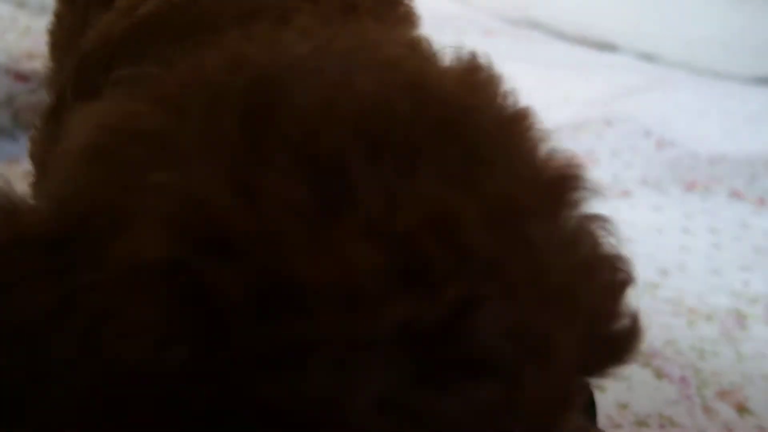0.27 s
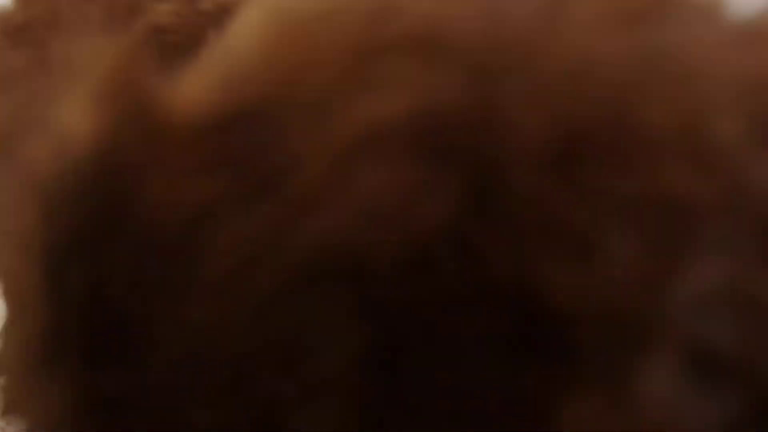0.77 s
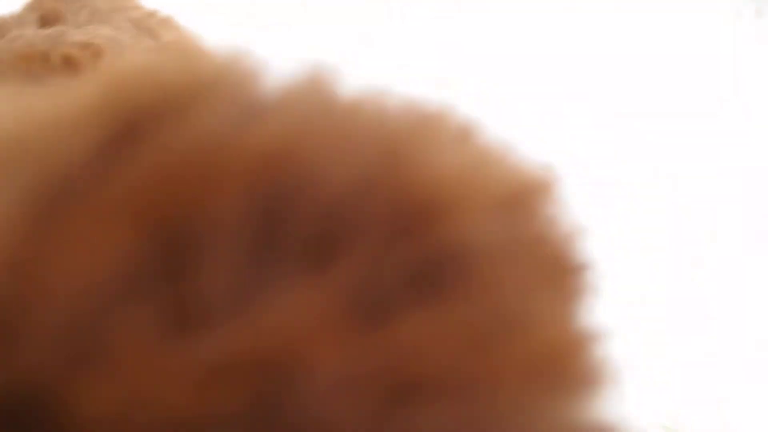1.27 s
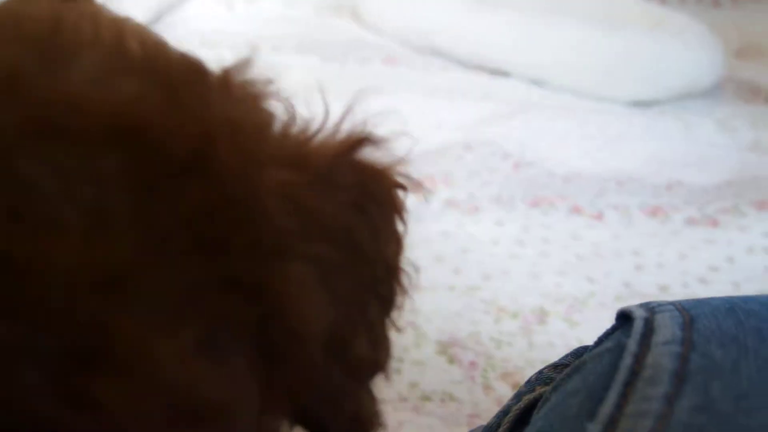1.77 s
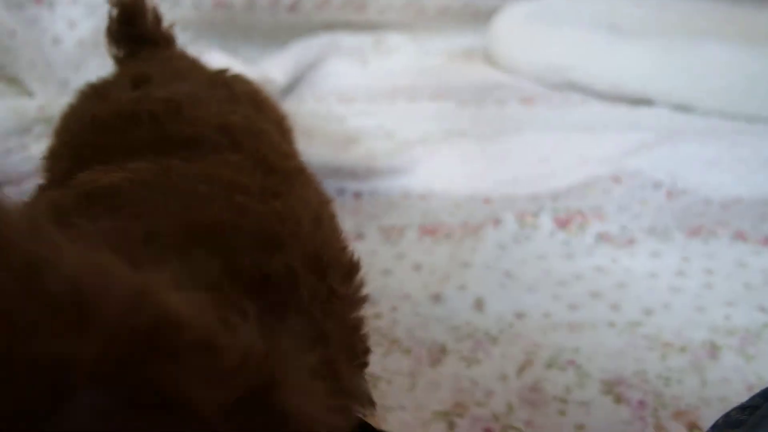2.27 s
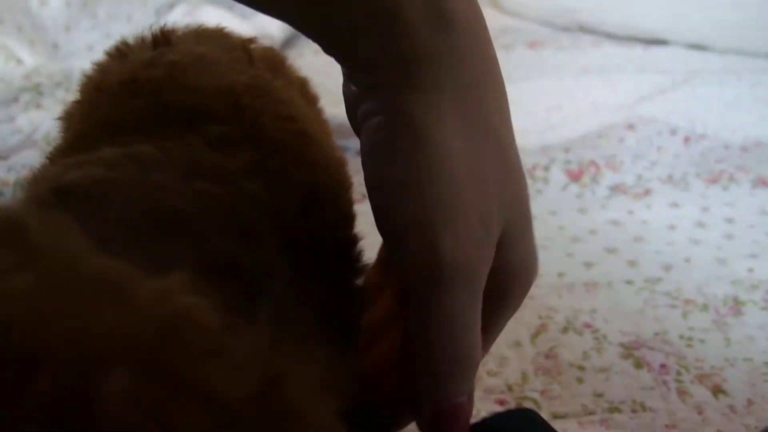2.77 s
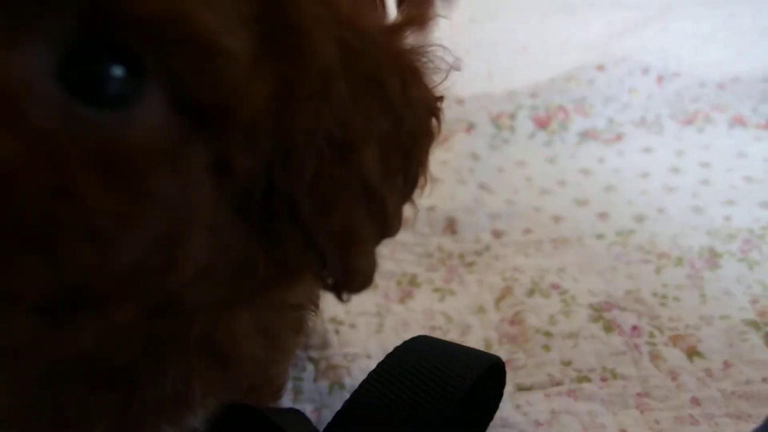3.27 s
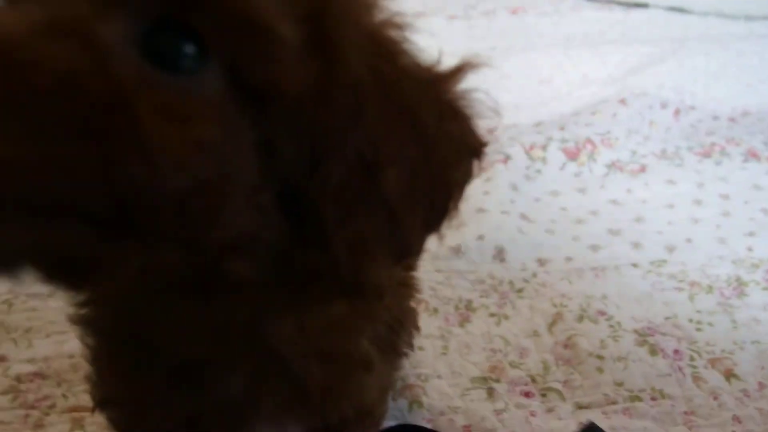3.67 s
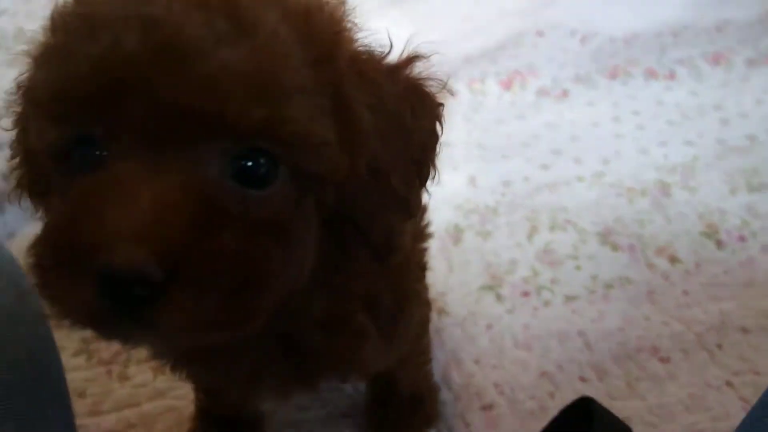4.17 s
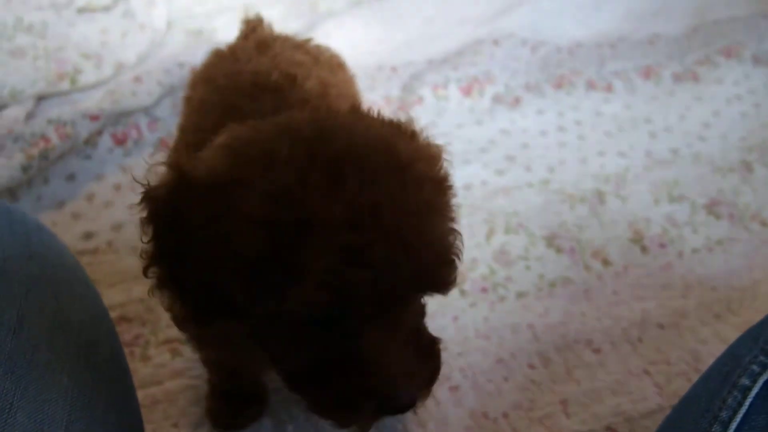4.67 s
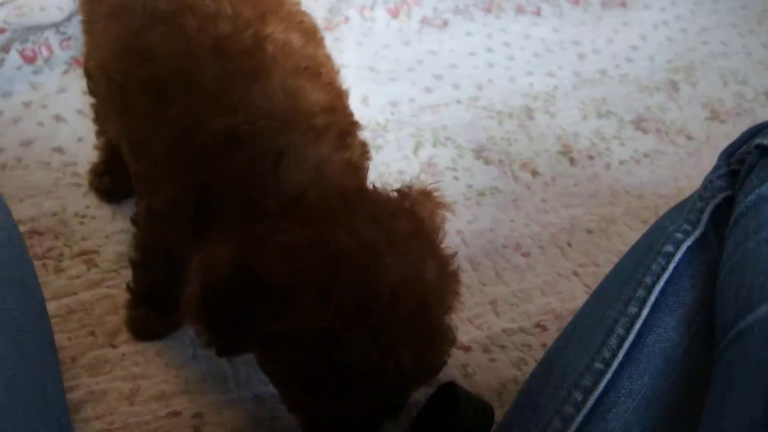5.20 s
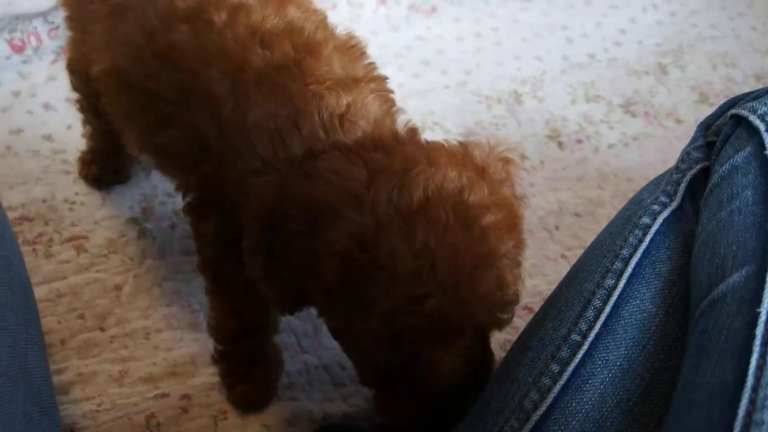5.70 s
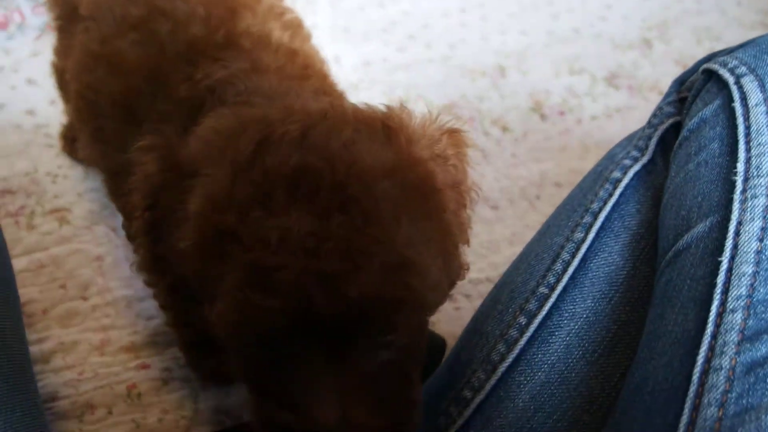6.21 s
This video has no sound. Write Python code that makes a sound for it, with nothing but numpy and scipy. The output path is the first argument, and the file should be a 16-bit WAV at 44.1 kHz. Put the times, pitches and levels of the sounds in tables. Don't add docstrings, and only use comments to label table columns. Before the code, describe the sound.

A quiet indoor room heard through a small hand-held camera: low beating machine hum, muffled rumble, thin hiss, and a faint lens rattle ticking about 15 times a second. Bedding shuffles dully. Light knocks and a soft low thud come around 0.4-0.6 s, then a very hard snap at 1.1 and a lesser one at 1.2, briefly ducking the room. Soft fur and cloth brushing grows from 1.4 to a strong stroke and thump at 1.8, continuing in softer rubs to about 2.9 with heavier mattress movement. It calms until a loud mouth smack at 3.8 and another at 4.0. Strap threads crackle and scrape from 4.05 to 4.5; a full smack lands at 4.8, wet small ones at 4.9. Sharp strap and buckle clicks cluster at 5.0-5.9, hardest near 5.2 and 5.6. Ticking stops at 5.9, a hush, then a bright motor whirr from 6.1 with small knocks to the end.

```python
import sys
import numpy as np
from scipy import signal
from scipy.fft import rfft, irfft, next_fast_len
from scipy.io import wavfile
from scipy.ndimage import uniform_filter1d

SR = 44100
rng = np.random.default_rng(int(sys.argv[2]) if len(sys.argv) > 2 else 0)


def dump(signal):
    limited = np.clip(np.atleast_2d(signal).T, -1, 1)
    pcm = np.round(limited * 32767).astype(np.int16)
    wavfile.write(sys.argv[1], SR, pcm)


def gain_from_decibels(decibels):
    exponent = np.asarray(decibels, float) / 20
    return 10 ** exponent


N = 284423
T_S = np.arange(N) / SR

AIR_DB, MEAN_WEIGHT_DB = -64, -45.5
DRIVE_STOP_S = 5.93
PORT_HZ = 3950


def rms_one(x):
    return x / np.sqrt(np.mean(x ** 2) + 1e-20)


def evened(x, span_s=0.13):
    return x / np.sqrt(uniform_filter1d(np.mean(x ** 2, axis=0), int(span_s * SR)) + 1e-20)


def at_hz(points, hz):
    point_hz, value = np.transpose(points)
    return np.interp(np.log(hz), np.log(point_hz), value)


def drift(rate_hz):
    r = np.exp(-80 * np.pi * rate_hz / SR)
    slow = signal.lfilter([1], [1, -2 * r, r * r], rng.standard_normal(N // 40 + 2002))[2000:]
    return np.interp(np.arange(N) / 40, np.arange(len(slow)), rms_one(slow))


def resonate(x, hz, width_hz):
    r = np.exp(-np.pi * width_hz / SR)
    top = np.array([1, 0, -1]) * (1 - r * r) / 2
    return signal.lfilter(top, [1, -2 * r * np.cos(2 * np.pi * hz / SR), r * r], x)


def resonate_twice(x, hz, width_hz):
    return resonate(resonate(x, hz, width_hz), hz, width_hz)


def band(x, low_hz, high_hz):
    edges_hz = [low_hz, min(high_hz, .45 * SR)]
    return signal.sosfilt(signal.butter(2, edges_hz, "band", fs=SR, output="sos"), x)


def place(x, lean_db, lag=0.):
    n = next_fast_len(x.shape[-1])
    left, right = np.broadcast_to(x, (2, x.shape[-1]))
    if lag:
        delay = np.exp(-2j * np.pi * np.fft.rfftfreq(n) * lag)
        right = irfft(rfft(right, n) * delay, n)[:len(left)]
    return np.array([left * gain_from_decibels(lean_db / 2), right * gain_from_decibels(-lean_db / 2)])


def apart(noise, share):
    return (noise[0] + share * noise[1] * np.array([[1], [-1]])) / np.sqrt(1 + share ** 2)


def coloured(spectrum):
    # f/Hz, likeness/1
    likeness = [(60, 0.99), (150, 0.94), (380, 0.8), (950, 1), (2380, 0.059), (5980, 0.082), (15000, 0.031)]
    # f/Hz, level/dB
    left_lean = [(60, 0.5), (150, 2), (380, 1), (950, -5.5), (2380, -7), (5980, -0.5), (15000, 0.5)]
    n = next_fast_len(N, real=True)
    hz = np.maximum(np.fft.rfftfreq(n, 1 / SR), 1)
    mid, side = rfft(rng.standard_normal((2, N)), n)
    alike = np.clip(at_hz(likeness, hz), -1, 1)
    lean = gain_from_decibels(at_hz(left_lean, hz) / 2)
    pair = np.sqrt(1 + alike) * mid + np.sqrt(1 - alike) * side * [[1], [-1]]
    return rms_one(irfft(pair * gain_from_decibels(at_hz(spectrum, hz)) * [lean, 1 / lean], n)[:, :N])


def gain_control():
    # t/s, depth/dB
    ducks = [(0.0, 2), (1.116, 7.5), (1.21, 3), (1.83, 0.5), (3.817, 5), (3.987, 6.5), (4.766, 0),
             (5.19, 3.5), (5.35, 3.5), (5.64, 3.5), (5.88, 2.5), (6.099, 2.5), (6.3, 1.5)]
    drop_s, recover_db_per_s = 0.018, 14
    depths_db = []
    for s, db in ducks:
        since_s = T_S - s
        depth_db = np.minimum(db * since_s / drop_s, db - recover_db_per_s * since_s)
        depths_db.append(np.clip(depth_db, 0, None))
    return -np.max(depths_db, axis=0)


def shifting_weight():
    # t/s, level/dB
    weight = [(0.0, -49.5), (0.41, -47), (0.57, -47), (0.93, -49), (1.11, -54), (1.33, -53.5), (1.63, -48),
              (1.85, -41.5), (2.86, -42.5), (3.09, -47), (3.57, -49.5), (4.04, -56), (4.44, -50.5),
              (4.63, -51.5), (4.99, -48), (5.19, -53), (6.11, -50), (6.45, -54)]
    s, db = np.transpose(weight)
    return np.interp(T_S, s, db) - MEAN_WEIGHT_DB


def drive_stopped():
    return np.clip((T_S - DRIVE_STOP_S) / 0.15, 0, 1)


def machine_hums(gain_db):
    high_hz, low_hz, in_step_s = 42.06, 36.76, .03
    turn = 2 * np.pi * (T_S - in_step_s)
    port_phase = np.array([[0], [-.32]])
    hum = gain_from_decibels(-37.5 - 30 * drive_stopped()) * np.cos(high_hz * turn + port_phase)
    hum = hum + gain_from_decibels(-44.5) * np.cos(low_hz * turn + port_phase)
    return place(np.sqrt(2) * hum * gain_from_decibels(gain_db + 0.62 * drift(5.9)), -0.43)


def rumble(gain_db, weight_db):
    # f/Hz, density/dB per Hz
    rumble_spectrum = [(11, -44.5), (18, 2.5), (38, -14.5), (60, -4), (105, -3), (158, -0.5), (236, -19.5),
                       (325, -20.5), (429, -31.5), (500, -27.5), (650, -26), (1100, -120)]
    # f/Hz, width/Hz, level/dB
    drone_modes = [(73.4, 7.5, -4), (99.5, 19, -4.5), (165.2, 3.6, -7), (208, 11.6, -2),
                   (250.1, 8.8, -10.5), (308.6, 9.2, -14.5), (364.7, 7, -18)]
    white = rng.standard_normal(N)
    tones = sum(gain_from_decibels(db) * rms_one(resonate_twice(white, hz, w * 1.4)) for hz, w, db in drone_modes)
    low = coloured(rumble_spectrum) + 0.35 * place(tones, 0.87)
    under = evened(band(low, 51.7, 118.4), span_s=0.14) * gain_from_decibels(-36.5 + gain_db + 0.32 * weight_db)
    over_db = 6.5 + MEAN_WEIGHT_DB + weight_db + 1.3 * drift(7.3)
    return under + evened(band(low, 120.0, 530)) * gain_from_decibels(over_db)


def hiss(gain_db):
    # f/Hz, density/dB per Hz
    hiss_spectrum = [(240, -27.5), (400, -8), (432, 0), (918, -3.5), (1070, -40), (1250, -15),
                     (1520, -11.5), (1830, -15), (2610, -15.5), (3840, -11), (5300, -12), (8540, -17.5),
                     (15800, -8.5)]
    whine_hz, top_hz = 15613, 15800
    stop = drive_stopped()
    whine = gain_from_decibels(-2) * np.sin(2 * np.pi * whine_hz * T_S + 1.2 * drift(8) + [[0], [1.2]])
    low_pass = signal.cheby2(10, 40, top_hz + 300, fs=SR, output="sos")
    topped = signal.sosfilt(low_pass, coloured(hiss_spectrum))
    topped = topped - 0.65 * stop * resonate(topped, 12400, 4000)
    return gain_from_decibels(AIR_DB + 0.75 * gain_db) * (gain_from_decibels(8.5 - 5.5 * stop) * topped + whine)


def shuffle(weight_db):
    hush_db, hush_s = -16, 0.16
    level_db = -54 + weight_db + hush_db * drive_stopped() * (T_S < DRIVE_STOP_S + hush_s)
    level_db = level_db + 2.2 * drift(18) + 1.5 * drift(4)
    mid, side = band(rng.standard_normal((2, N)), 397, 1140) * gain_from_decibels(level_db - 2.2 * 0)
    return 3.35 * (place(mid, 1.1) + 0.43 * side * [[1], [-1]])


def lumps(weight_db):
    lumps_per_s, cycles = 90, 5.0
    strength_db = 3.0 * np.minimum(rng.exponential(1, N), 4)
    gives = (rng.random(N) < lumps_per_s / SR) * gain_from_decibels(strength_db) * rng.choice([-1, 1], N)
    dealt = rng.integers(0, 8, N)
    rung = np.zeros(N)
    for k, hz in enumerate(np.geomspace(140, 400, 8)):
        rung += resonate_twice(gives * (dealt == k) + 1e-18, hz, hz / cycles) / hz
    return place(rms_one(rung) * gain_from_decibels(-55 + 1.28 * weight_db), 1.6)


def lens_drive(gain_db):
    # [(f/Hz, level/dB, t60/s, late/s)]
    grips = [
        (0.0, [(730, -8, .04, .008), (1275, 3, .016, 0), (1030, -8, .012, 0), (1900, -3, .04, 0), (3950, -15, .008, .002), (5350, -17, .006, .001)]),
        (1.2, [(740, -6, .035, .009), (1230, 0, .014, 0), (1000, -5, .012, 0), (1900, -4, .04, .001), (4900, -16, .008, .004)]),
        (2.3, [(770, -1, .03, .008), (1270, -1, .016, 0), (1870, -9, .016, .002), (2400, -15, .02, .003), (3450, -13, .012, .003), (4400, -13, .01, .003)]),
        (3.12, [(870, 3, .018, .004), (620, -2, .015, .004), (1250, -2, .02, 0), (1720, -9, .02, .006), (2330, -12, .03, .006), (3420, -8, .014, .005), (4250, -12, .01, .005)]),
        (3.9, [(830, -2, .018, .005), (680, -4, .02, .004), (1215, 1, .022, 0), (1750, -8, .016, .002), (2340, -11, .025, .003), (4000, -14, .01, .003)]),
        (4.8, [(760, -1, .02, .005), (1230, 2, .016, -.004), (1820, -7, .016, -.003), (2330, -13, .03, 0)]),
    ]
    start_s, steps_per_s = .0372, 14.98
    backlash_s, backlash_db = 0.0294, -22
    since = (T_S - start_s) % (1 / steps_per_s)
    step = ((T_S - start_s) * steps_per_s + 1.3).astype(int)
    rattle = np.e * since / 0.0033 * np.exp(-since / 0.0034)
    rattle = rattle + 0.23 * np.exp(-((since - .06) / 0.0093) ** 2)
    knock = np.diff(1. * (since > .0045), prepend=1) > 0
    loose = rng.standard_normal(N)
    push = 0.6 * loose * rattle + 12.0 * knock
    touch = loose * np.exp(-((since - backlash_s) / 0.0028) ** 2)
    out = gain_from_decibels(backlash_db) * band(touch, 2300, 5800)
    ends_s = [s for s, _ in grips[1:]] + [N / SR]
    for (grip_s, modes), end_s in zip(grips, ends_s):
        held = slice(round(grip_s * SR), round(end_s * SR))
        for hz, db, t60, late_s in modes:
            step_amp = gain_from_decibels(db + 1.3 * rng.standard_normal(step.max() + 1))
            strength = step_amp[step[held]] * np.sqrt(t60 / 0.026)
            late_push = np.roll(push, round(late_s * SR))[held]
            out[held] += resonate(late_push * strength + 1e-18, hz, np.log(1000) / np.pi / t60)
    return place(rms_one(out) * gain_from_decibels(AIR_DB + gain_db + 4.5) * (T_S < DRIVE_STOP_S), 6.7)


def snaps(events, length_s, tail_db, tail_s, broad, lean_db, lag, share, width, crack_hz, crack_width,
          low, creep_db, size, crack_share, follows, port_width, square, airy):
    n, lead = size, 600
    out, t = np.zeros((2, N + n)), (np.arange(n) - lead) / SR
    after = np.maximum(t, 0)
    rise = 1 - np.exp(-after / 0.0003)
    cluster = rise * np.exp(-(after / length_s) ** square)
    sharp = rise * np.exp(-after / (0.2 * length_s))
    spray = rise * np.exp(-(after / (crack_share * length_s)) ** 1.7)
    creep = gain_from_decibels(creep_db) * np.exp(np.minimum(t, 0) / 0.006) * (t < 0)
    tail = gain_from_decibels(tail_db) * np.exp(-after / tail_s) * (t > 0)
    release = 11.0 * (np.arange(n) == lead + 20)
    for s, crack_db, hz, body_db, port_hz, port_db in events:
        a, b, c = rng.standard_normal((3, 2, n))
        a, b, c = apart(a, 2 * share), apart(b, share), apart(c, share)
        push = a * (cluster + 2 * creep) + release
        slap = band(a * sharp, 580, min(2800, 2.3 * hz)) + low * band(a * sharp, 320, 1040)
        slap_db = np.clip(follows * (crack_db - body_db), -12, 6)
        body = resonate(resonate(push, hz, width * hz), hz, .5 * hz) + broad * gain_from_decibels(slap_db) * slap
        body = body + 1.8 * resonate_twice(b * tail, hz, 0.2 * hz) + 0.44 * band(b * tail, 500, 2600)
        port = resonate(b * (cluster + creep + 0.11 * tail), port_hz, port_width * port_hz)
        port = port + 0.34 * band(b * sharp, 3700, 7840)
        crack = resonate(c * spray, crack_hz, crack_width) + airy * c * spray
        crack = band(crack, 5240, 15600)
        body, port, crack = [gain_from_decibels(db) * v / np.abs(v).max() for v, db in
                             ((body, body_db + 8.0), (port, port_db + 3.0), (crack, crack_db - 0.5))]
        i = round(s * SR) - lead
        out[:, i:i + n] += place(body, 0.44) + place(port, lean_db, lag) + place(crack, 0.35, lag)
    return out[:, :N]


def case_knocks():
    # t/s, crack peak level/dB, body f/Hz, body level/dB, port level/dB
    knocks = [(0.3947, -35, 2300, -50, -75), (0.42, -55, 2350, -57, -65), (0.5022, -28, 2040, -47, -58),
              (0.5232, -36, 2360, -55, -52), (0.56, -55, 2000, -59, -65), (1.008, -40, 690, -52, -33.5),
              (1.1156, -4, 1270, -27, -5.5), (1.2095, -21.5, 690, -34.5, -18),
              (1.3554, -43, 2780, -49, -65), (1.59, -49, 1050, -44, -62), (1.611, -39, 940, -46, -41),
              (1.7642, -45, 1300, -42, -26), (1.8261, -38, 1750, -29, -12), (2.099, -48, 1600, -36, -35.5),
              (2.1511, -32, 833, -40, -33), (2.156, -47, 830, -41, -48), (2.178, -55, 1200, -46, -60),
              (2.207, -55, 1900, -48, -60), (2.8445, -47, 721, -46, -58), (3.1832, -72, 830, -42.5, -51),
              (3.3154, -64, 850, -42.5, -41.5), (3.6245, -29, 533, -66, -68),
              (3.6449, -56, 536, -38.5, -46), (3.956, -51, 2340, -48, -65), (4.8965, -32, 1030, -32, -45),
              (4.7655, -20, 750, -26, -19), (4.7665, -30, 2900, -30, -30), (5.4525, -40, 1500, -46, -28),
              (3.9865, -14, 1053, -42, -41), (6.0257, -46, 582, -81, -46),
              (6.1004, -44.5, 1640, -45.5, -35), (6.2086, -43, 870, -46.5, -39)]
    port_hz_per_db = 67.5
    events = [(s, crack, hz, body, PORT_HZ + port_hz_per_db * max(port + 21, 0), port)
              for s, crack, hz, body, port in knocks]
    return snaps(events, 0.0032, -22.0, 0.0037, 0.96, lean_db=-1.5, lag=1.8, share=0.38, width=0.098,
                 crack_hz=11700, crack_width=3600, low=1.5, creep_db=-32, size=3000, crack_share=0.61,
                 follows=0.25, port_width=.2, square=1.7, airy=.17)


def thuds():
    # t/s, f/Hz, swell/s, level/dB
    paw_falls = [(.51, 161, 0.039, -34), (1.831, 665, 0.0049, -23.5), (1.832, 500, 0.0065, -38),
                 (2.56, 215, 0.052, -40.5), (2.82, 200, 0.046, -42.5), (1.05, 201, 0.075, -45),
                 (1.652, 152.6, 0.1, -38), (2.0, 166, 0.1, -35.5), (2.17, 122.2, 0.018, -32),
                 (3.78, 210.4, 0.04, -45.5), (6.22, 228.3, 0.047, -49), (6.23, 773, 0.0031, -40.5),
                 (6.24, 620, 0.0093, -51), (6.232, 1084, 0.0041, -52), (6.235, 330, 0.015, -51),
                 (6.223, 434, 0.0068, -49)]
    tones, wobble = np.zeros(N), drift(17.5)
    for s, hz, swell_s, db in paw_falls:
        first, last = round((s - 3 * swell_s) * SR), round((s + 3 * swell_s) * SR)
        i = np.arange(max(first, 0), min(last, N))
        swell = np.exp(-((i / SR - s) / swell_s) ** 2)
        tones[i] += gain_from_decibels(db) * swell * np.sin(2 * np.pi * hz * i / SR + wobble[i])
    return place(np.sqrt(2) * tones, 1.9)


def stroked(strokes):
    levels_db = []
    for s, rise_s, hold_s, fall_s, db in strokes:
        slope = np.minimum((T_S - s) / rise_s, (s + hold_s - T_S) / fall_s)
        levels_db.append(db + 20 * np.minimum(slope, 0))
    return np.max(levels_db, axis=0)


def rubbing(strokes, ring, lean_db, share, grain_db, clump_db, bright_db, harder, dull_db, top_hz, skirt, notch):
    notch_hz, grains_per_s = 2680, 4000
    brush_db = np.maximum(stroked(strokes), -120)
    slip_amp = gain_from_decibels(grain_db * np.minimum(rng.exponential(1, (2, N)), 4))
    slips = (rng.random((2, N)) < grains_per_s / SR) * slip_amp * rng.choice([-1, 1], (2, N))
    grains = rms_one(slips) + .8 * rng.standard_normal((2, N))
    fibres = apart(grains, share) * gain_from_decibels(clump_db * drift(66))
    rung = sum(gain_from_decibels(db) * resonate(resonate(fibres, hz, w), hz, skirt * w) for hz, w, db in ring)
    brush = rms_one(band(band(rung, 2900, 10000), 2900, 10000))
    brush = brush - notch * resonate(brush, notch_hz, 650)
    brush = brush + gain_from_decibels(dull_db) * rms_one(band(band(fibres, 600, 3100), 500, 3500))
    bright = rms_one(band(fibres, 4600, top_hz))
    bright_level_db = brush_db + bright_db + harder * (brush_db + 39.0)
    return place(brush * gain_from_decibels(brush_db + 2.0), lean_db, 2.08) + place(bright * gain_from_decibels(bright_level_db), -0.5, 1.57)


def cloth_brushing():
    # peak t/s, rise/s, hold/s, fall/s, level/dB
    cloth = [
        (1.346, 0.021, 0.017, 0.078, -58),
        (1.452, 0.21, .02, 0.43, -63),
        (1.61, 0.019, 0.043, 0.26, -55.5),
        (1.755, 0.13, 0.022, 0.079, -48),
        (1.81, 0.055, 0.043, 0.022, -36.5),
        (2.044, 0.014, .005, 0.04, -50.5),
        (2.18, 0.054, 0.065, 0.13, -48),
        (2.35, 0.4, 0.027, 0.018, -50.5),
        (2.415, 0.038, 0.011, 0.013, -49.5),
        (2.926, 0.24, .01, 0.29, -58.5),
    ]
    # f/Hz, width/Hz, level/dB
    cloth_ring = [(4000, 600, -4), (4900, 4100, -2.5)]
    return rubbing(cloth, cloth_ring, -1.3, 0.67, 1.1, 1.0, bright_db=-2.5, harder=0.13, dull_db=-5.5,
                   top_hz=15800, skirt=2.7, notch=.2)


def strap_ticks():
    # t/s, crack peak level/dB, buckle f/Hz, buckle level/dB, port level/dB
    buckle = [
        (4.465, -26.5, 1670, -52, -43),
        (4.628, -42, 1860, -40.5, -59),
        (5.188, -5, 1760, -37, -18.5),
        (5.299, -46, 2080, -29, -16.5),
        (5.3516, -19.5, 2060, -27, -17),
        (5.6014, -57, 2160, -30.5, -26.5),
        (5.641, -3.5, 2310, -47, -20.5),
        (5.6699, -41, 2250, -35.5, -20.5),
        (5.7754, -48.5, 2310, -29.5, -17),
    ]
    # t/s, crack peak level/dB, body level/dB, port level/dB
    edge_ticks = [(1.6922, -45, -62, -40), (2.1854, -26.5, -65, -60), (2.4974, -37, -65, -62),
                  (3.891, -40, -57, -49), (3.979, -20.5, -65, -58), (4.164, -36, -64, -41),
                  (4.3158, -34, -49, -32.5), (4.5986, -34, -65, -36), (4.849, -47, -61.5, -34),
                  (4.9558, -28, -63, -33), (4.9852, -44, -65, -48), (5.01, -36, -64, -37),
                  (5.038, -23, -54, -27), (5.058, -45, -67, -35), (5.0847, -47, -62, -38),
                  (5.098, -48, -56, -31), (5.154, -23, -57, -30), (5.163, -10, -51, -24),
                  (5.197, -28, -56, -35), (5.213, -48, -66, -39.5), (5.2683, -44, -65, -44),
                  (5.3252, -28, -49, -41), (5.4522, -25, -53, -24), (5.8114, -39, -42, -30),
                  (5.8187, -14.5, -41, -19), (5.8429, -34, -47, -21.5), (5.862, -19, -54, -23),
                  (5.8805, -18, -35.5, -18.5), (6.2145, -31, -50, -41.5)]
    # t/s, peak level/dB
    catches = [(4.0525, -36), (4.0605, -33), (4.1122, -33), (4.116, -32), (4.1262, -34.5), (4.1804, -35),
               (4.2095, -30.5), (4.2258, -32), (4.2363, -28), (4.242, -26.5), (4.2624, -34.5),
               (4.2725, -34), (4.342, -36), (4.35, -23), (4.3647, -27), (4.409, -35), (4.4294, -25.5),
               (4.446, -29), (4.4782, -31), (4.494, -29), (4.502, -27.5), (4.519, -36), (4.5267, -36),
               (4.9422, -33), (4.948, -38), (4.9634, -33), (5.2237, -45), (5.6784, -27), (5.7623, -39),
               (5.833, -27), (5.8526, -23), (5.894, -35)]
    strap_body_hz, port_spread = 1140, 0.025
    ticks = list(buckle)
    ticks += [(s, crack, strap_body_hz, body, port) for s, crack, body, port in edge_ticks]
    ticks += [(s, db - 14, strap_body_hz, db - 41, db - 4.5) for s, db in catches]
    ports_hz = PORT_HZ * (1 + port_spread * rng.standard_normal(len(ticks)))
    events = [(s, crack, hz, body, port_hz, port)
              for (s, crack, hz, body, port), port_hz in zip(ticks, ports_hz)]
    return snaps(events, 0.0025, -14, 0.0053, 3.0, lean_db=-3.5, lag=2.07, share=0.5, width=0.5,
                 crack_hz=7820, crack_width=5000, low=1.2, creep_db=-26.0, size=2200, crack_share=0.37,
                 follows=.01, port_width=0.065, square=1.83, airy=.04)


def mouth_smacks():
    # t/s, crack peak level/dB, mouth f/Hz, mouth level/dB, upper f/Hz
    smacks = [
        (3.8162, -4.5, 1884, -20.5, 5210),
        (3.9858, -12, 1843, -24.5, 3770),
        (4.7648, -11.5, 1520, -16.5, 3800),
        (4.8805, -37, 1730, -33.5, 3950),
        (4.8871, -34, 1572, -27, 4080),
        (4.891, -23, 1706, -22.5, 4000),
    ]
    upper_db = -13
    events = [(*smack, smack[1] + upper_db) for smack in smacks]
    return snaps(events, 0.0052, -30, 0.042, 0.4, lean_db=4.0, lag=0.75, share=0.14, width=0.13,
                 crack_hz=10220, crack_width=1000, low=0.49, creep_db=-24, size=7000, crack_share=0.67,
                 follows=0.011, port_width=0.066, square=3.0, airy=.2)


def strap_dragging():
    # peak t/s, rise/s, hold/s, fall/s, level/dB
    strap = [(4.05, 0.0085, 0.006, 0.018, -43), (4.12, 0.03, 0.0032, 0.028, -47),
             (4.166, .018, .004, .02, -54), (4.235, 0.17, 0.033, 0.035, -45),
             (4.35, 0.04, 0.025, 0.057, -45), (4.42, 0.27, 0.11, 0.012, -46),
             (4.85, 0.0096, 0.033, 0.046, -44), (4.952, 0.036, .003, 0.049, -46),
             (5.05, 0.0067, .003, 0.064, -46.5), (5.296, 0.015, 0.015, 0.018, -44.5),
             (5.348, 0.015, 0.009, 0.0041, -39), (5.448, .018, .004, 0.0091, -67),
             (5.597, 0.034, 0.0037, .01, -60), (5.627, 0.013, 0.0059, 0.042, -49),
             (5.672, 0.01, 0.0055, 0.017, -34), (5.77, 0.034, 0.012, 0.027, -56.5),
             (5.806, 0.0087, 0.024, .004, -61), (5.842, 0.026, 0.0067, 0.0047, -41),
             (5.852, .01, 0.023, 0.011, -44.5)]
    # f/Hz, width/Hz, level/dB
    case_modes = [(3870, 800, 2), (3330, 420, -5.5), (4450, 650, -9), (5700, 1500, -14)]
    return rubbing(strap, case_modes, -4.5, 0.58, 6.1, 2.8, bright_db=-8.0, harder=-0.22, dull_db=-13.5,
                   top_hz=13000, skirt=0.85, notch=0.68)


def whirr():
    # f/Hz, width/Hz, level/dB
    whirr_modes = [(1760, 120, 13), (3410, 71, 17), (3910, 190, 18.5), (4840, 250, 12), (5840, 160, 21.5),
                   (7700, 310, 10), (10000, 280, -26), (13750, 210, 4)]
    start_s, kick_db, kick_s = 6.097, 15, .008
    throb_hz, throb_db, spin_up_s = 56, -1.5, 0.11
    white = apart(rng.standard_normal((2, N)), 0.61)
    tone = sum(gain_from_decibels(db) * resonate(white, hz, 2.6 * w) for hz, w, db in whirr_modes)
    on = np.maximum(T_S - start_s, 0)
    level_db = -52.5 + kick_db * np.exp(-on / kick_s) + 1.1 * drift(33.6)
    level_db = level_db + throb_db * np.sin(2 * np.pi * throb_hz * on)
    level_db = level_db + 1.5 * np.tanh((on - spin_up_s) / 0.018)
    return place(rms_one(tone) * gain_from_decibels(level_db) * (on > 0), 2.0, 1.9)


def scene():
    gain_db, weight_db = gain_control(), shifting_weight()
    room = machine_hums(gain_db) + rumble(gain_db, weight_db) + hiss(gain_db)
    bedding = shuffle(weight_db) + lumps(weight_db) + thuds()
    handling = case_knocks() + cloth_brushing() + strap_ticks() + strap_dragging()
    return room + bedding + handling + mouth_smacks() + lens_drive(gain_db) + whirr()


def roll_off(x):
    return signal.sosfilt(signal.butter(12, 17110, fs=SR, output="sos"), x)


def record(dry):
    mic_top_hz = 15950
    dry = signal.sosfilt(signal.butter(18, mic_top_hz, fs=SR, output="sos"), dry)
    return roll_off(0.91 * np.tanh(dry / 0.88))


dry = scene()
out = record(dry)
dump(out)
```